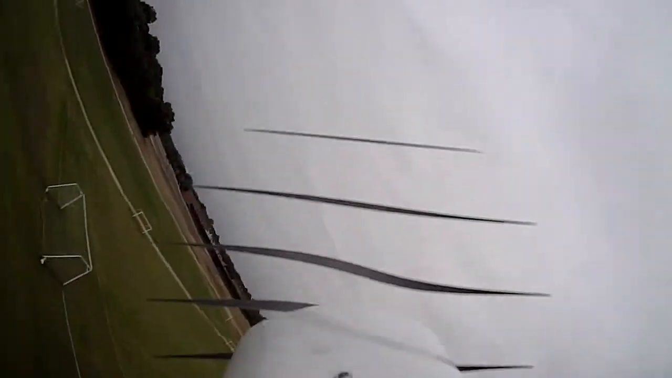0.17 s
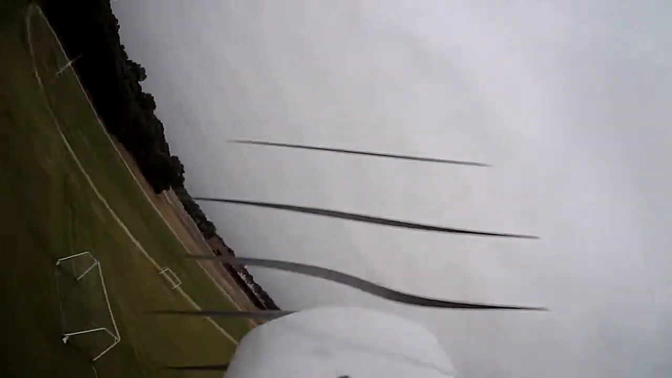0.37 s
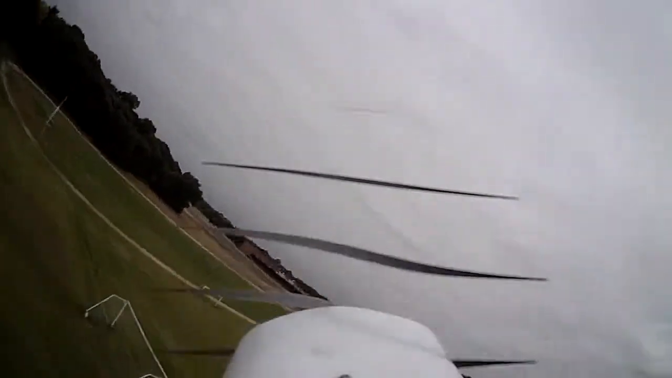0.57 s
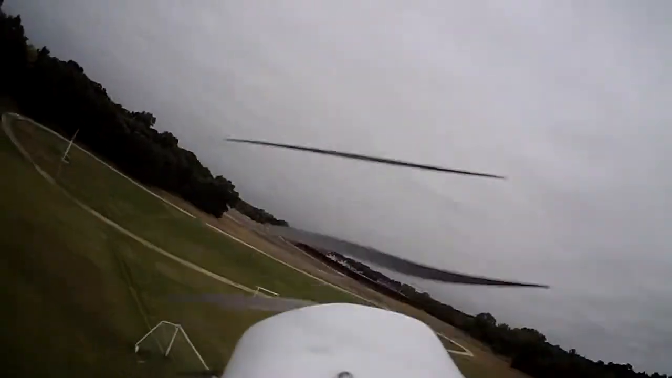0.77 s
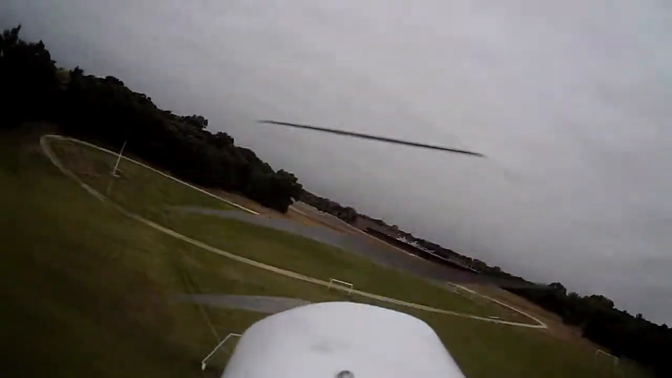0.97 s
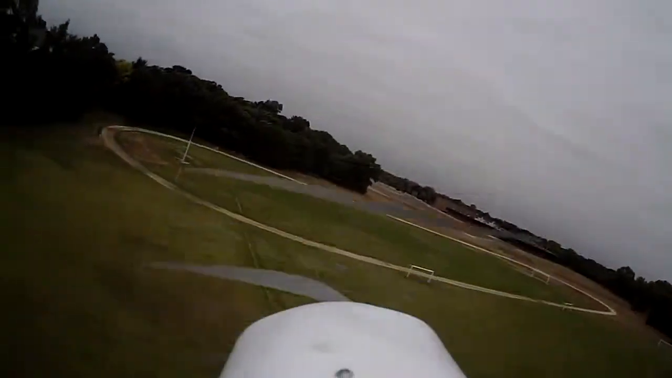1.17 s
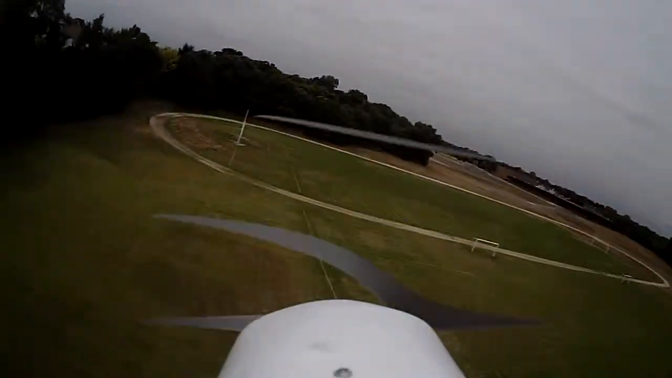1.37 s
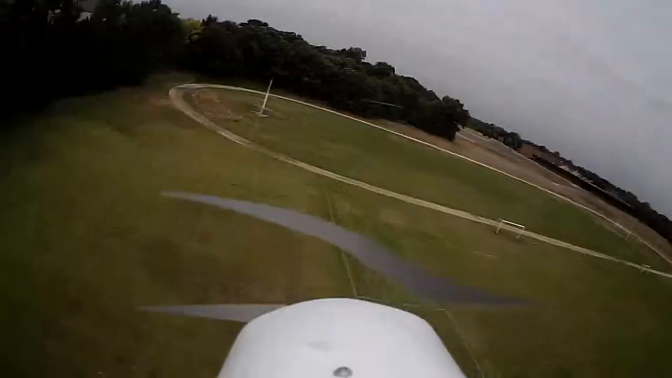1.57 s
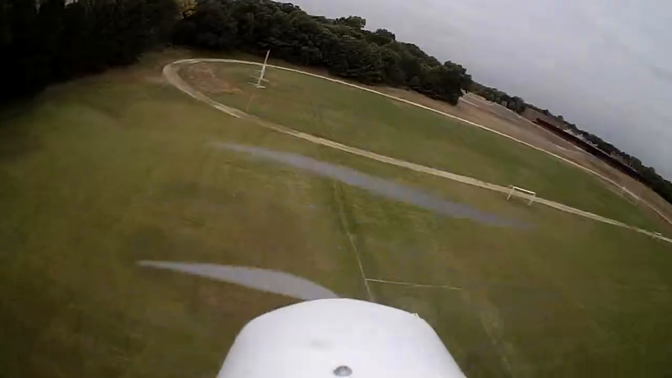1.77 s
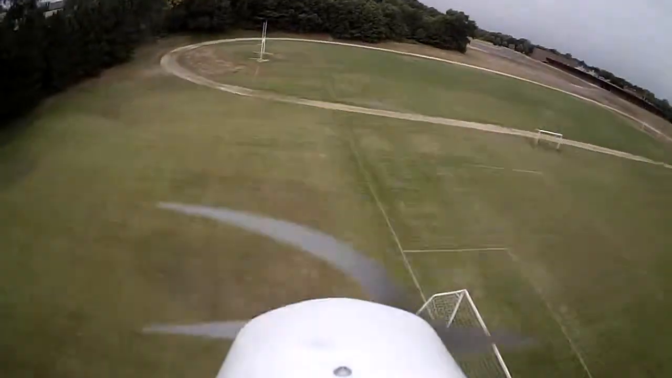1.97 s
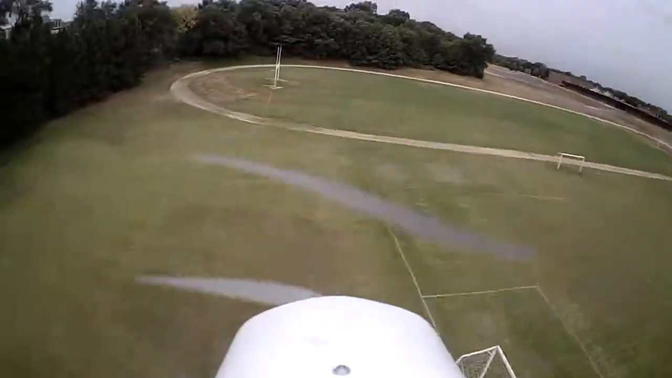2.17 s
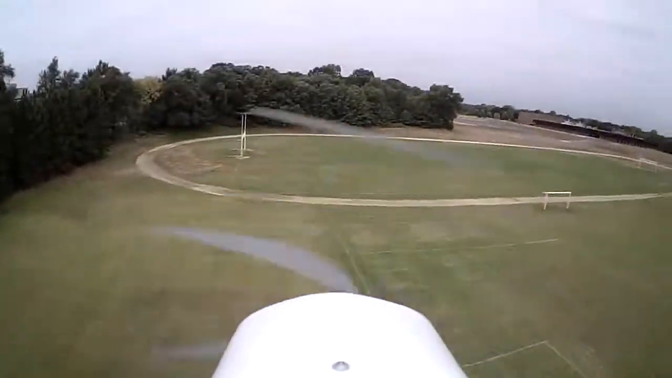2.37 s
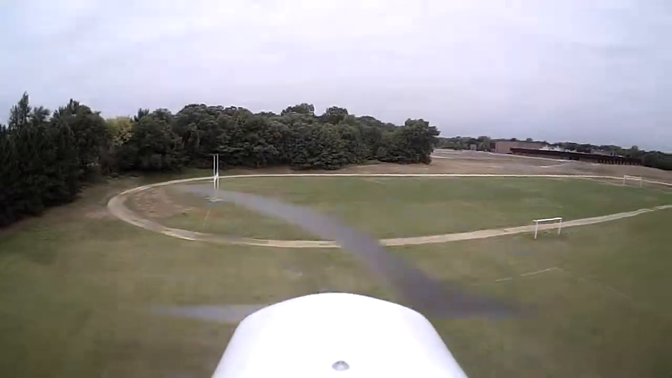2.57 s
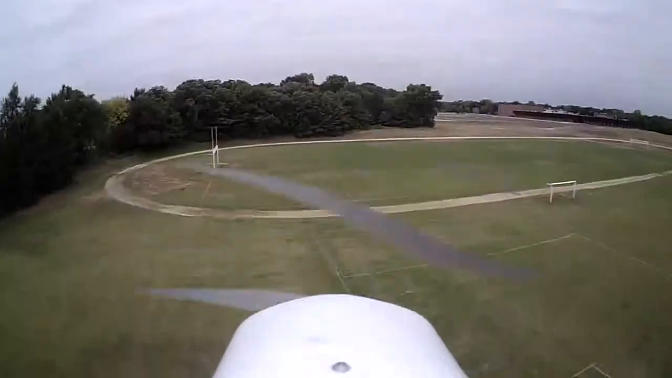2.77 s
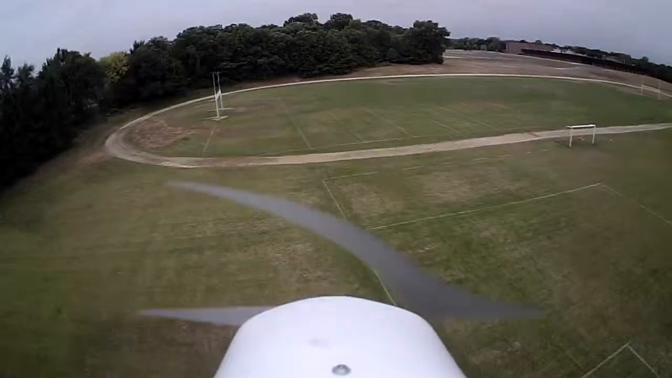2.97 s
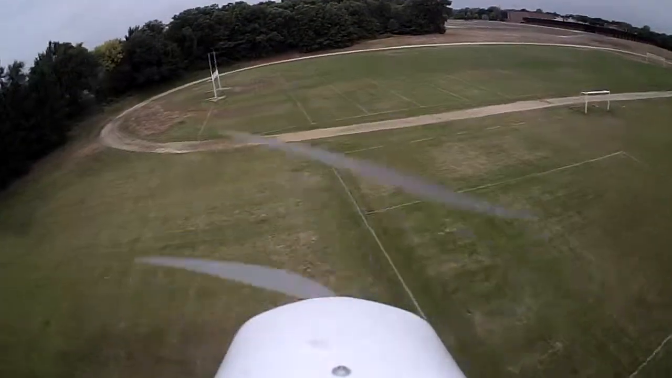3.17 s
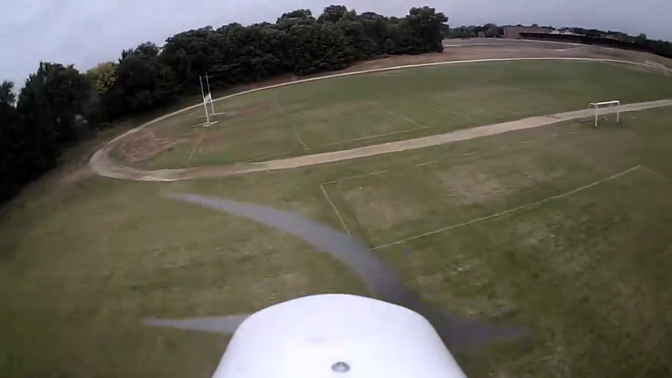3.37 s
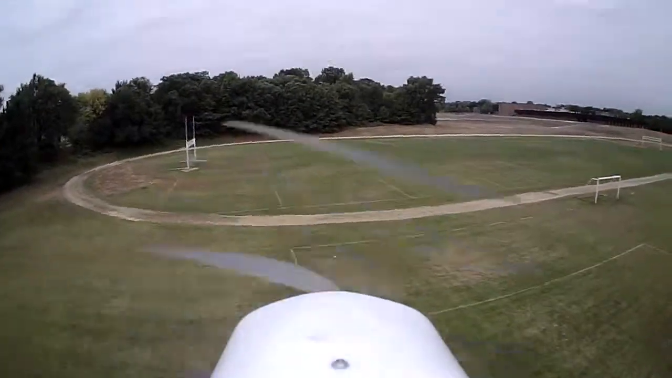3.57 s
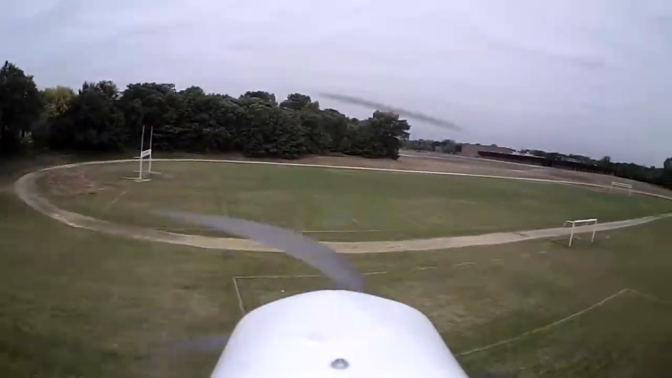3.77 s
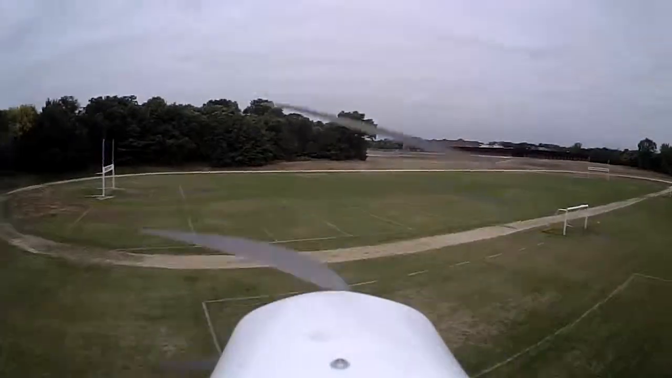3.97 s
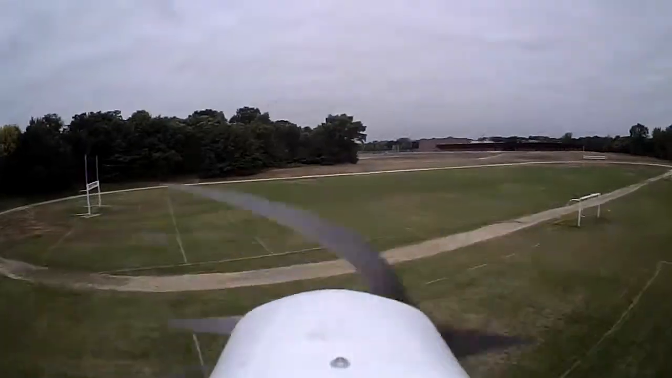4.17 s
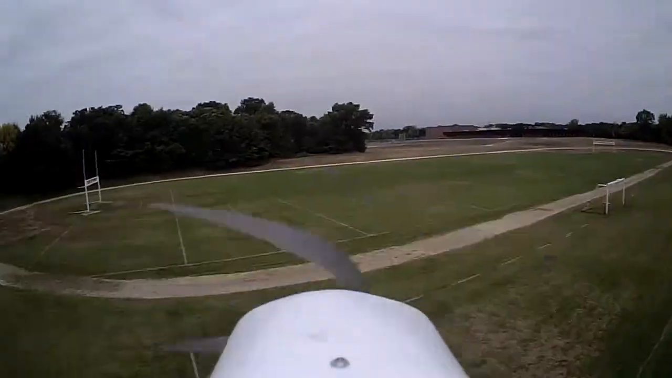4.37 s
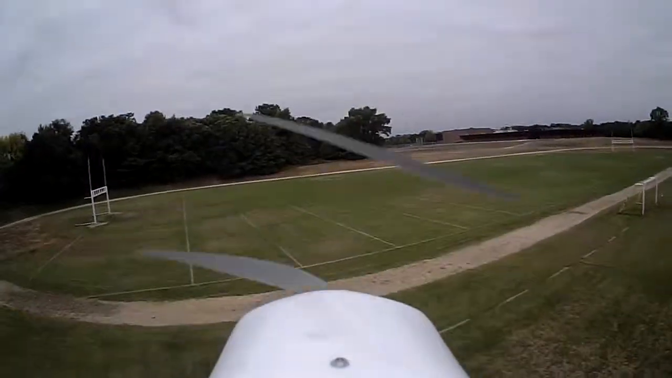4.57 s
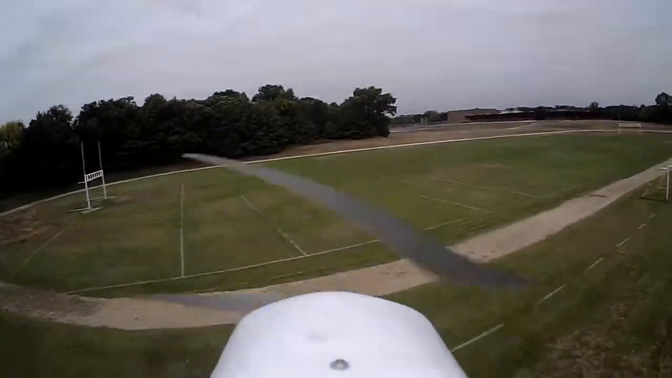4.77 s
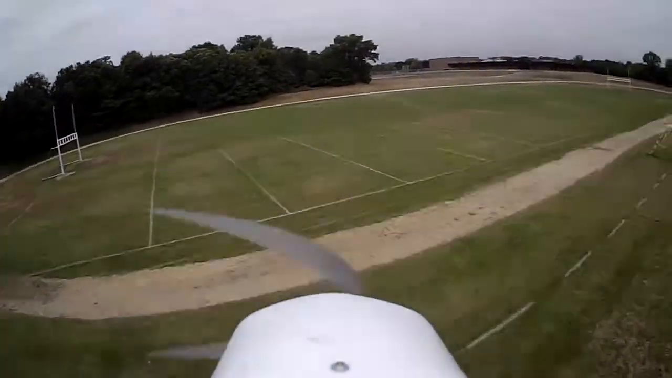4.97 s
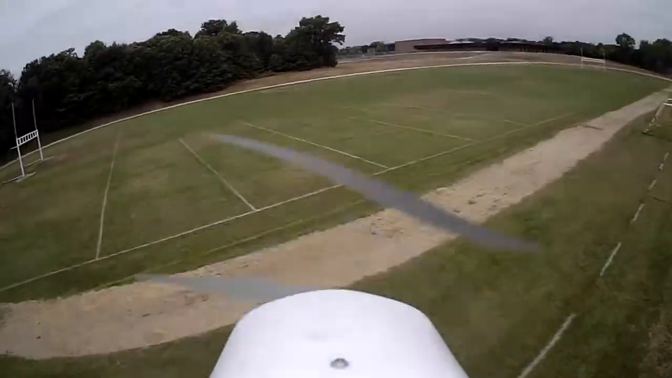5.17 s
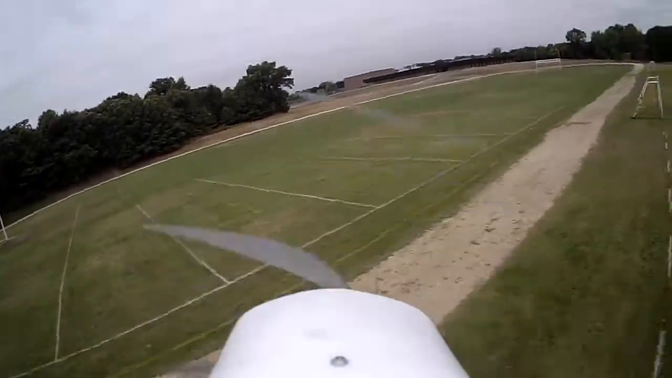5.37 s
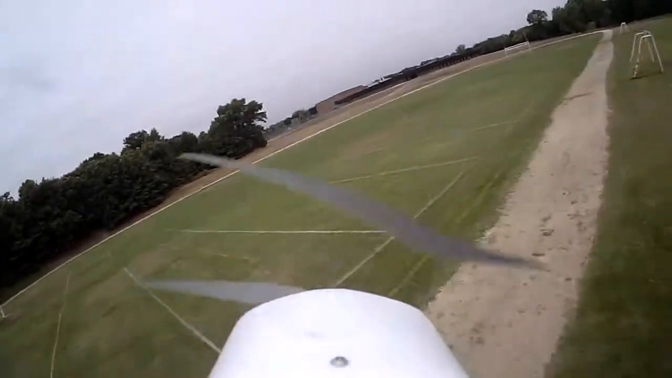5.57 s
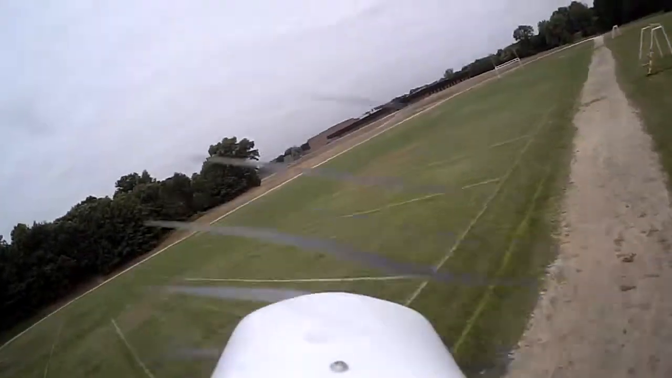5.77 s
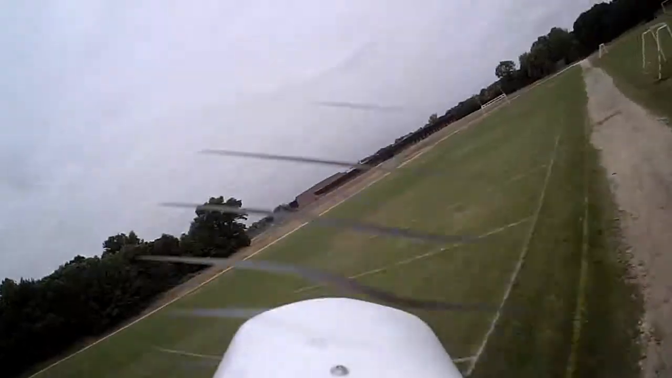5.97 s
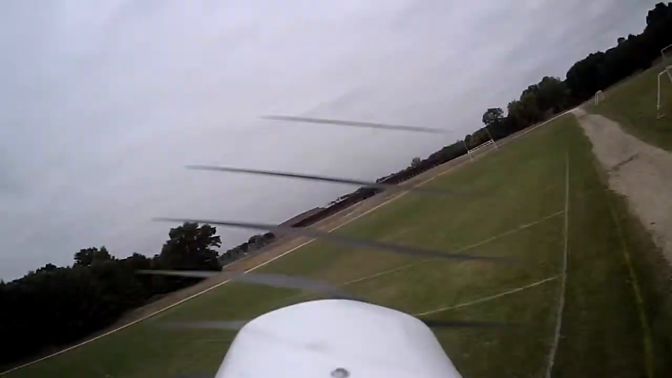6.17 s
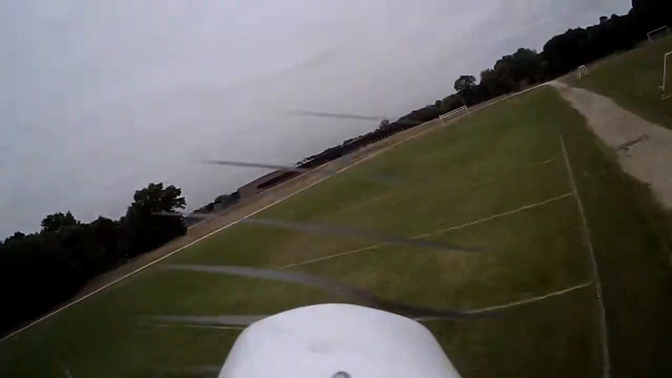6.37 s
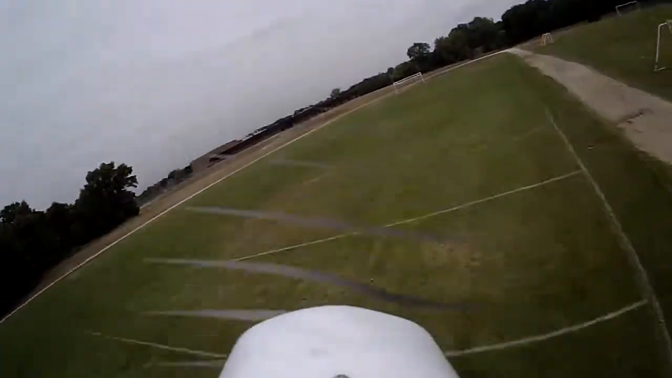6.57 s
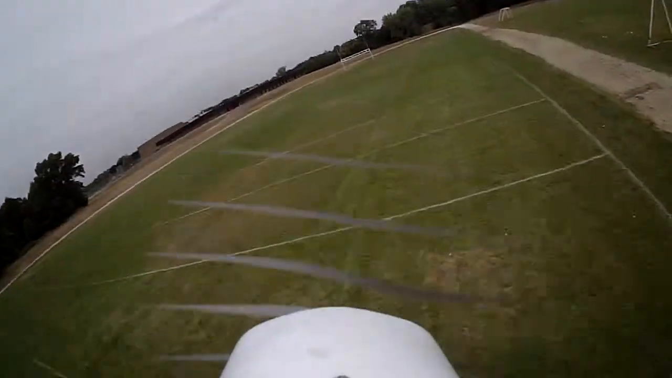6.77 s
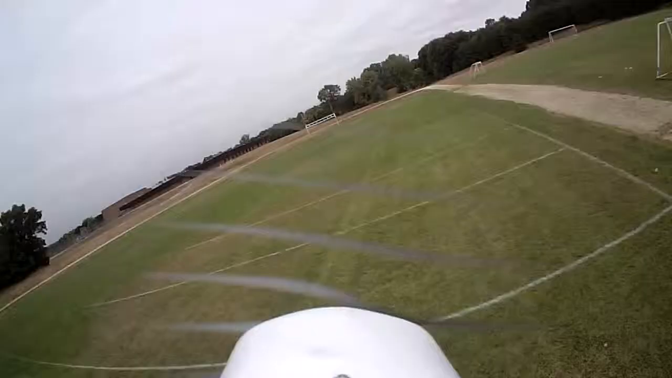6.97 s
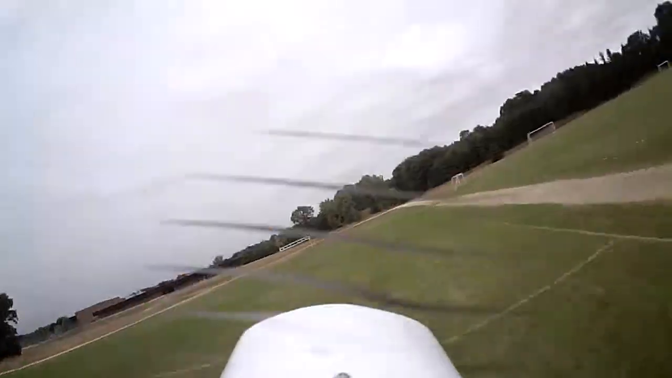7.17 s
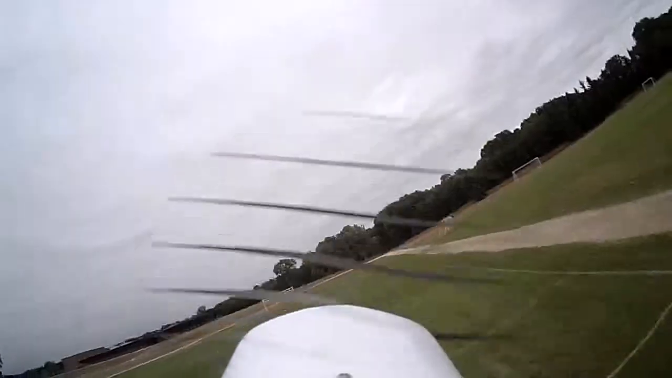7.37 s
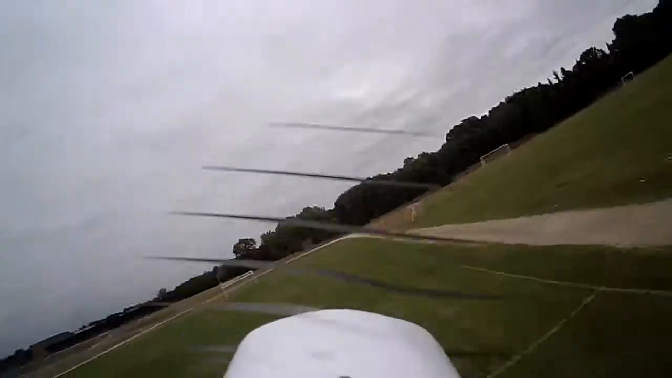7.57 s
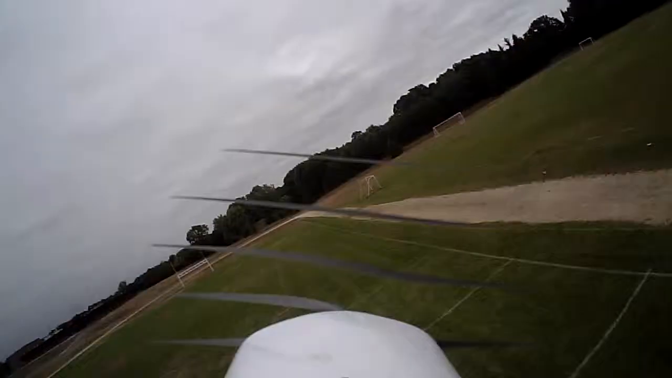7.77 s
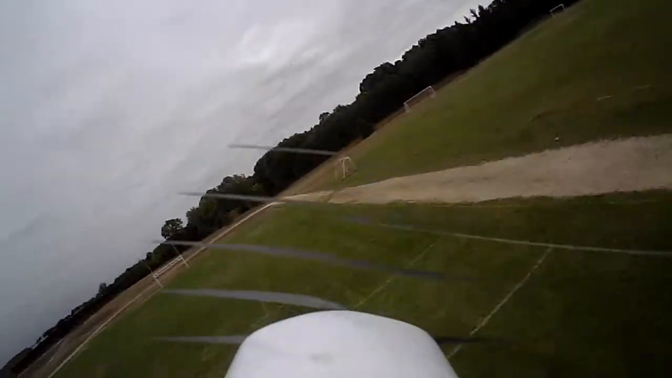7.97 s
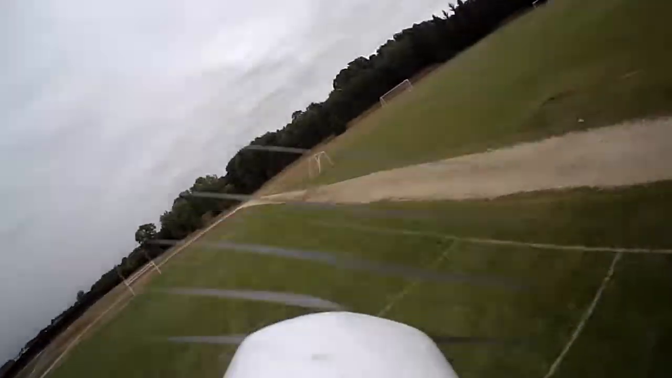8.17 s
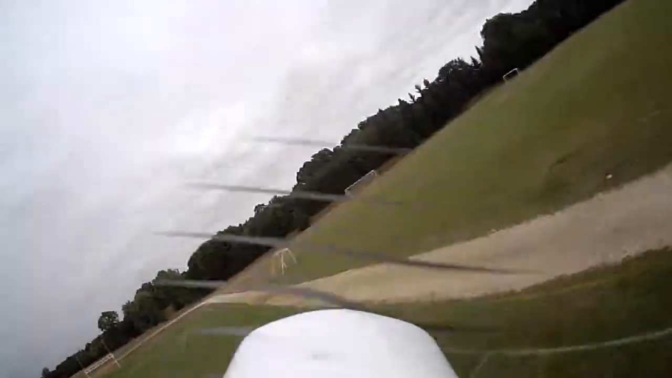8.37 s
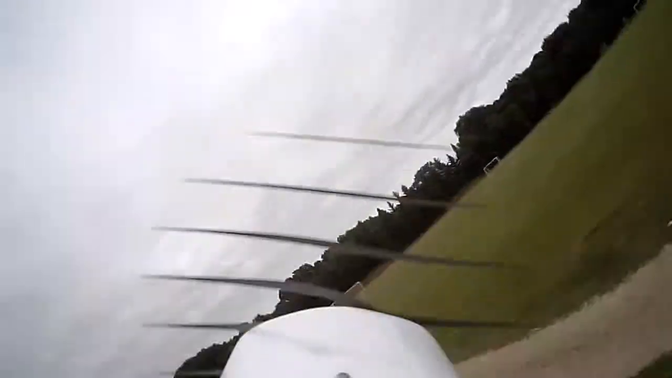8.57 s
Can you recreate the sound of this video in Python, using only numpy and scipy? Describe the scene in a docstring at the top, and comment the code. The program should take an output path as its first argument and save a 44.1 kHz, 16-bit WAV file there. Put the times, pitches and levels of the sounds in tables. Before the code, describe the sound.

A small electric model plane is in flight over an open field, heard from a microphone on board just behind the propeller. At first the propeller hums inside a rush of air, with a thin, high motor whine. From about 0.5 seconds the pitch falls, and by 1.3 seconds the motor is off. The plane glides more quietly, its blades turning with a faint low flutter under gusting wind. Gusts slap the microphone with short crackles from about 2 to 3.8 seconds, and again around 4.7 to 5.4 seconds. At 5.6 seconds the motor spins up quickly: the whine returns, the propeller buzz rises, and the air becomes a loud, hissing roar. The buzz climbs again from 6.5 seconds, peaks near 7.5 seconds with rough wind buffeting, then drops slightly, still running hard at the end, around 8.6 seconds.

```python
"""The nose of a small electric model plane in flight, heard from a camera just behind the two-blade propeller.
The throttle closes, the propeller windmills through a glide, then the motor drives it up to near full power.
Blade harmonics and motor switching are locked to one shaft angle; the controller's chopping tone keeps a
fixed pitch. The airflow is shaped noise that follows the shaft speed and gusts. Single eddies slap the
microphone with a crackle, and the loudest peaks clip."""
import sys
import numpy as np
from scipy import signal
from scipy.fft import rfft, irfft, next_fast_len
from scipy.io import wavfile
from scipy.ndimage import uniform_filter1d, map_coordinates

SR = 44100
rng = np.random.default_rng(int(sys.argv[2]) if len(sys.argv) > 2 else 0)


def wav_out(sig):
    """Save sig, one row per channel (or a flat mono array), as 16-bit PCM at SR to the path in sys.argv[1]."""
    wavfile.write(sys.argv[1], SR, np.round(np.clip(np.atleast_2d(sig).T, -1, 1) * 32767).astype(np.int16))


N = 380141
TIME = np.arange(N) / SR
CONTROL_TIME = TIME[::32]

# Share of the time that the controller feeds the motor. Each row: time in seconds, throttle 0-1.
THROTTLE = [(0, 0.6), (.55, 0.3), (.74, 0.07), (1.22, 0.08), (1.32, 0), (5.505, 0), (5.6, 0.4),
            (6.25, 0.73), (6.76, 0.74), (7.02, 0.99)]


def amp(db):
    """Decibels to gain."""
    return 10 ** (np.asarray(db) / 20)


def unit(x):
    """x at rms 1."""
    return x / np.sqrt(np.mean(x ** 2) + 1e-20)


def held(x):
    """x at a running rms of 1."""
    power = np.abs(uniform_filter1d(x ** 2, size=8000))
    return x / np.sqrt(power + 1e-12)


def curves(rows):
    """One value per sample for each column after the time."""
    s, *cols = np.transpose(rows)
    return [np.interp(TIME, s, c) for c in cols]


def per_sample(control):
    """A slow control at the sample rate."""
    return np.interp(TIME, CONTROL_TIME, control)


def wobble(rate):
    """A smooth random curve, rate knots a second."""
    knots = rng.standard_normal(int(N * rate / SR) + 4)
    return per_sample(map_coordinates(knots, [CONTROL_TIME * rate]))


def filtered(x, response):
    """x filtered by a response given as a function of frequency in Hz."""
    m = next_fast_len(N + SR // 2)
    return irfft(rfft(x, m) * response(np.fft.rfftfreq(m, 1 / SR)), m)[:N]


def noise(spectrum):
    """Noise of rms 1 with a spectrum of (Hz, relative dB) points."""
    f, db = np.transpose(spectrum)

    def response(hz):
        return amp(np.interp(np.log(hz + 1), np.log(f), db))

    return unit(filtered(rng.standard_normal(N), response))


def by_speed(fast, slow_spectrum, fast_spectrum):
    """Noise whose colour passes from one spectrum to the other as fast goes from 0 to 1."""
    return np.sqrt(1 - fast) * noise(slow_spectrum) + np.sqrt(fast) * noise(fast_spectrum)


def by_law(law, blade_hz):
    """Level in dB: a power of the speed, and a further change as the flow over the nose breaks up."""
    cruise_hz, rough_from_hz, rough_full_hz = 200, 198.6, 235.7
    cruise_db, doubling_db, rough_db = law
    rough = np.interp(blade_hz, [rough_from_hz, rough_full_hz], [0, 1])
    return cruise_db + doubling_db * np.log2(blade_hz / cruise_hz) + rough_db * rough


def blade_angle(blade_hz, flutter, top_flutter):
    """Phase that goes round once per blade; rough air makes it waver, most at top speed."""
    waver = np.interp(blade_hz, [228, 248], [flutter, top_flutter])
    return 2 * np.pi * np.cumsum(blade_hz * (1 + waver * wobble(30))) / SR


def propeller(angle, blade_hz):
    """Each blade sends a suction pulse past the microphone; turbulence varies its strength."""
    # Speed laws. Columns: dB at cruise, dB per doubling of speed, extra dB in broken flow.
    tone_law = (-30, 7.2, -0.6)
    overtone_law = (-29, 7.8, -1)
    # Stretches where the hum stands out of the wash.
    # Each row: start and end in seconds, tone gain in dB, overtone gain in dB.
    hums = [(0, 0.453, 13, 2), (0.54, .66, 11, 11.5), (.74, .8, 8, 7.5), (0.883, 1.18, 11, 7.5),
            (1.8, 1.878, -1, 8.5), (2.0, 2.3, 10.5, 2), (2.5, 2.95, 0, 4.5), (3.147, 3.452, 11, 8),
            (4.97, 5.15, 11, 1), (5.7, 5.8, 5, -6), (5.888, 6.19, 15.5, -7), (6.419, 6.581, 8, 4),
            (7.29, 7.47, 14.5, 5), (7.65, 7.849, -6, 7), (8.193, 8.623, 13.5, 0)]
    fade_s = 0.071
    overtone_fall_db = 6  # from one overtone to the next

    def swell(start, end):
        return np.interp(CONTROL_TIME, [start - fade_s, start, end, end + fade_s], [0, 1, 1, 0])

    gains = sum(np.outer(gains_db, swell(start, end)) for start, end, *gains_db in hums)
    tone_db, overtone_db = map(per_sample, gains)
    tone = amp(by_law(tone_law, blade_hz) + tone_db + 0.68 * wobble(22)) * np.cos(angle)
    overtones = sum(amp(-overtone_fall_db * (k - 2) + wobble(18)) * np.cos(k * angle) for k in range(2, 6))
    return -(tone + amp(by_law(overtone_law, blade_hz) + overtone_db) * overtones)


def unbalance(angle, blade_hz):
    """The shaft shakes the airframe once a turn, strongly only near top speed."""
    shake = amp(-24.5 + 2.9 * wobble(5.2)) * (blade_hz / 260) ** 6
    return shake * (np.cos(angle / 2) + amp(1) * np.cos(3 * angle / 2))


def motor(angle, blade_hz):
    """Chopping tone, its fizz and a switching whine that rings the can; all fade at no and full throttle."""
    # Resonances of the motor can. Each row: centre in Hz, width in Hz, gain in dB.
    can_modes = [(3720, 530, 0.5), (5309, 500, -6)]
    # Fine hiss around the chopping tone. Each row: frequency in Hz, relative level in dB.
    fizz_spectrum = [(5000, -26), (6200, -4), (6800, 6), (7600, 2), (8400, -15), (11000, -29), (16000, -50)]
    chop_hz = 7244
    chop_db, sideband_db, octave_db, fizz_db = -42, -31, -41, -4.5  # last three relative to the chop
    throttle, = curves(THROTTLE)
    chop = amp(chop_db) * np.sin(np.pi * np.clip(throttle, 0, 1))
    load = np.minimum(blade_hz / 180, 1)

    # 14 poles give 42 switchings a turn, 21 a blade
    steps = 21 * angle
    # uneven switching frays the whine
    frayed = steps + .55 * wobble(300)

    # mixed with the chopping, the switching throws rising and falling lines
    carrier = np.sin(2 * np.pi * chop_hz * TIME)
    sidebands = np.cos(steps / 3) + np.cos(frayed) + np.cos(2 * frayed)
    tone = carrier * (1 + amp(sideband_db) * sidebands + 0.1 * wobble(210))
    tone += amp(octave_db) * np.sin(2 * np.pi * 2 * chop_hz * TIME)

    fizz = amp(fizz_db) * load ** 5 * noise(fizz_spectrum)

    def can(f):
        return sum(amp(db) * (1j * f * w / (c * c - f * f + 1j * f * w)) ** 2 for c, w, db in can_modes)

    switching = np.cos(frayed)
    switching += .5 * np.cos(2 * frayed) * (1 + 2 * carrier)
    switching += .5 * np.cos(3 * frayed)
    whine = amp(1) * load ** 1.2 * filtered(switching, can)
    return chop * (tone + fizz + whine)


def wash_levels(blade_hz):
    """Buffet, roar, hiss and sizzle in dB: wash trails the propeller's speed; gusts swell and ebb on top."""
    # Speed laws. Columns: dB at cruise, dB per doubling of speed, extra dB in broken flow.
    buffet_law = (-32, 1.84, 13)
    roar_law = (-20, 9.7, 2.74)
    hiss_law = (-37.5, 16.94, 1.7)
    sizzle_law = (-49.5, 23.1, 2.02)
    # Gusts, and lulls where negative.
    # Each row: centre in seconds, half length in seconds, gains in dB of buffet, roar and hiss.
    gust_rows = [(0.075, 0.056, 0, -1, -0.5), (0.453, 0.19, -2, 2.5, 2.5), (1.048, 0.33, -0.5, 1, 2),
                 (1.6, 0.21, 1.5, -1, -2.5), (1.89, 0.2, 1.5, 3, 5.5), (2.23, 0.21, 5, 4.5, 9),
                 (2.601, .04, 3, 2, 6), (2.76, 0.076, 0, 1, 5), (2.898, 0.016, 13.5, 7, 9),
                 (3.149, 0.06, 7.5, 5, 7.5), (3.362, 0.16, 4.5, 6.5, 11.5), (3.702, 0.042, 6, 1, 4),
                 (4.25, .2, -1, 0, -1.5), (4.82, .05, 0, -0.5, -4), (4.646, 0.085, 7, 0.5, 4),
                 (5.1, 0.14, 3.5, 6, 10), (5.3, 0.071, -4, 0.5, 1), (5.52, .06, -3, -0.5, -2),
                 (5.781, 0.16, 6, -2, 0.5), (5.927, 0.088, 3, 1, 2), (6.17, 0.17, 3.5, -3, -1),
                 (6.528, 0.087, 2.5, -1, -4), (6.662, .08, -2, 0, 3), (6.867, 0.039, 5, 0.5, -2.5),
                 (7.043, .12, 1.5, -1.5, 2), (7.28, 0.11, 8, -1, 0.5), (7.413, 0.05, 6, 2, 0),
                 (7.52, 0.048, -8, -1.5, -5), (7.885, 0.16, -19, 0, -1.5), (8.114, 0.053, 5, 1.5, 0),
                 (8.334, .08, 3.5, 1.5, 4), (8.532, .04, 8.5, 0, 3.5)]
    wash_lag_s = 0.077
    sizzle_per_hiss = 1.05  # dB of sizzle for each dB that a gust adds to the hiss
    thrust_sizzle_db = 5  # extra at full throttle, when the blades bite

    keep = np.exp(-1 / (wash_lag_s * SR))
    wash_hz = blade_hz[0] + signal.lfilter([1 - keep], [1, -keep], blade_hz - blade_hz[0])
    gusts = sum(np.outer(gains_db, np.exp(-((CONTROL_TIME - s) / half_s) ** 2))
                for s, half_s, *gains_db in gust_rows)
    buffet_gust, roar_gust, hiss_gust = map(per_sample, gusts)

    buffet_db = by_law(buffet_law, wash_hz) + buffet_gust + 1.3 * wobble(7)
    roar_db = by_law(roar_law, wash_hz) + roar_gust
    hiss_db = by_law(hiss_law, wash_hz) + hiss_gust
    # sizzle needs both fast blades and fast air: it comes last and goes first
    sizzle_db = by_law(sizzle_law, np.minimum(blade_hz, wash_hz))
    sizzle_db += sizzle_per_hiss * hiss_gust + thrust_sizzle_db * curves(THROTTLE)[0]
    return buffet_db, roar_db, hiss_db, sizzle_db


def ticks(wake, rate, spread_db):
    """Sparse dry ticks at rms 1, rate a second on average, most likely as a blade wake passes."""
    passing = (1 + wake) ** 4
    hit = rng.random(N) < rate / SR * passing / passing.mean()
    size = amp(spread_db * np.minimum(rng.exponential(size=N), 3))

    def colour(hz):
        highpass = (hz / 2500) ** 2 / (1 + (hz / 2500) ** 2)
        return highpass / (1 + (hz / 4400) ** 4)

    return unit(filtered(hit * size, colour))


def airflow(angle, blade_hz, blades):
    """Turbulence on the microphone, chopped by the blade wakes; its treble spits at the suction peaks."""
    # Noise spectra. Each row: frequency in Hz, relative level in dB.
    buffet_slow, buffet_fast = [(12, -2), (30, -7), (70, 1), (130, -1), (200, -5.5), (320, -6.5),
                                (700, -24), (2000, -82)], [(12, -9), (30, -11), (70, -4.5), (115, .5), (165, 3.5),
                                                     (220, 1), (320, -1.5), (700, -37), (2000, -80)]
    roar_slow, roar_fast = [(60, -21), (150, -2.5), (260, -2), (400, -1.5), (700, -6), (1000, -9.5),
                            (1350, -11), (1650, -11), (1930, -16.5), (2200, -23), (2700, -32.5),
                            (6000, -84)], [(60, -6.5), (150, -7), (260, -1.5), (480, -1), (700, -4),
                                               (1000, -7), (1650, -11), (2000, -16.5), (2400, -24.5),
                                               (3100, -49), (6000, -80)]
    hiss_spectrum = [(1200, -22), (2400, 1.5), (3100, 0), (4000, 0), (4900, -2.5), (5800, -10),
                     (6800, -7.5), (7600, -18.5), (11000, -40), (16000, -50)]
    sizzle_spectrum = [(2500, -28), (5000, 0), (7200, 1.5), (9000, 0), (12000, -4.5), (15000, -8),
                       (16000, -25)]

    buffet_db, roar_db, hiss_db, sizzle_db = wash_levels(blade_hz)
    wake = np.cos(angle)
    # at top speed the flow is so rough that single wakes blur
    order = np.interp(blade_hz, [80, 205, 250], [.6, 1, .35])

    # faster wash makes smaller eddies: a higher buffet and a fuller roar
    fast = np.clip((blade_hz - 130) / 120, 0, 1)
    buffet = amp(buffet_db) * by_speed(fast, buffet_slow, buffet_fast)
    roar_chop = unit(amp(2.5 * order * wake + 0.72 * wobble(45)))
    roar = amp(roar_db) * by_speed(fast, roar_slow, roar_fast) * roar_chop

    suction = -held(filtered(blades + buffet + roar, lambda hz: 1 / (1 + (hz / 600) ** 4)))
    bursts_db = 2.2 * order * wake + 2.5 * np.clip(suction, -1, 3)
    bursts_db += 1.87 * wobble(350) + wobble(40)

    # the thinner the hiss, the more single ticks stand out of it
    tick_share = np.interp(hiss_db, [-62, -52, -42], [.7, .35, 0])
    crackle = tick_share * ticks(wake, rate=85, spread_db=2.6)
    hiss = amp(hiss_db) * (noise(hiss_spectrum) * unit(amp(0.75 * bursts_db)) + crackle)

    # the sizzle dies away in slack air and comes in bursts when it is loud
    spit = np.interp(sizzle_db, [-76, -55], [.15, 1.1])
    slack_db = np.interp(sizzle_db, [-80, -68], [-6, 3])
    sizzle = amp(sizzle_db + slack_db) * noise(sizzle_spectrum) * held(amp(spit * bursts_db))
    return buffet + roar + hiss + sizzle


def slaps(push_s, crackle_s):
    """A strong eddy is one pull on the diaphragm with a short crackle at its peak."""
    # Each row: time in seconds, crackle level in dB, push level in dB, both before the trims below.
    slap_rows = [(2.149, -35, -32), (2.2303, -30.5, -17.5), (2.2869, -32, -32), (2.3415, -32, -36),
                 (2.3795, -35, -22), (2.4157, -37, -30), (2.4295, -37, -19), (2.9032, -29, -18),
                 (3.2183, -34.5, -29), (3.2697, -33, -23), (3.3348, -35, -28), (3.372, -28.5, -31),
                 (3.458, -32.5, -28), (3.6561, -40, -38), (3.679, -34, -33), (3.7623, -39, -40),
                 (4.7357, -40, -34), (5.0713, -44, -28), (5.1018, -42, -23), (5.1452, -36, -35),
                 (5.1554, -38, -28), (5.353, -43, -40), (5.3678, -40, -26), (5.3837, -37.5, -36)]
    push_trim_db, crackle_trim_db = 5.5, -2.5
    push, crackle = np.zeros(N), np.zeros(N)
    for s, crackle_db, push_db in slap_rows:
        near = np.abs(TIME - s) < .02
        t = TIME[near] - s - .001  # the peak comes 1 ms after the row's time
        push[near] -= amp(push_db + push_trim_db) * np.exp(-np.abs(t) / push_s)
        crackle[near] += amp(crackle_db + crackle_trim_db) * np.exp(-(t / crackle_s) ** 2)
    spectrum = [(500, -15), (2000, 13), (5000, 5.5), (9000, -8), (12000, -13), (15000, -28)]
    return push + crackle * noise(spectrum)


def swishes():
    """Short bright swells of fluttering noise in the glide."""
    # Each row: frequency in Hz, relative level in dB.
    swish_spectrum = [(2500, -25), (3700, 10), (5500, -4), (7700, 0), (9300, -5), (11000, -20),
                      (16000, -40)]
    # Each row: centre in seconds, half length in seconds, level in dB.
    swish_rows = [(2.62, 0.062, -64), (4.68, 0.039, -59)]
    swell = sum(amp(db) * np.exp(-((TIME - s) / half_s) ** 2) for s, half_s, db in swish_rows)
    return noise(swish_spectrum) * unit(amp(2.5 * wobble(220))) * swell


def scene():
    """Propeller, motor switching and wash follow the one shaft; the microphone adds a faint hiss of its own."""
    # Propeller speed. Each row: time in seconds, blade rate in Hz.
    speed = [(0, 203.7), (.48, 206.6), (.56, 194.5), (.75, 152.5), (.9, 130.5), (1.1, 117.5), (1.5, 96.7),
             (2.0, 83.13), (3.4, 78), (4.1, 69.7), (5.05, 69.3), (5.53, 67.35), (5.62, 85.9), (5.8, 176.6),
             (5.88, 209.3), (5.97, 221.5), (6.17, 226.3), (6.5, 226.1), (7.15, 255), (7.45, 274.6),
             (7.8, 253.1), (8.25, 252.5), (8.62, 241.7)]
    blade_hz, = curves(speed)
    angle = blade_angle(blade_hz, flutter=0.0051, top_flutter=0.018)
    blades = propeller(angle, blade_hz)
    drive = blades + unbalance(angle, blade_hz) + motor(angle, blade_hz)
    air = airflow(angle, blade_hz, blades) + slaps(push_s=0.00084, crackle_s=0.00084) + swishes()
    floor = amp(-74) * rng.standard_normal(N)
    return (drive + air + floor)[None]


def record(dry):
    """The camera clips the strongest peaks with a rounded knee and keeps nothing above its band limit."""
    ceiling, top_hz = .71, 15750
    clipped = dry[0] / (1 + np.abs(dry[0] / ceiling) ** 10) ** (1 / 10)
    return filtered(clipped, lambda hz: hz < top_hz)[None]


dry = scene()
out = record(dry)
wav_out(out)
```